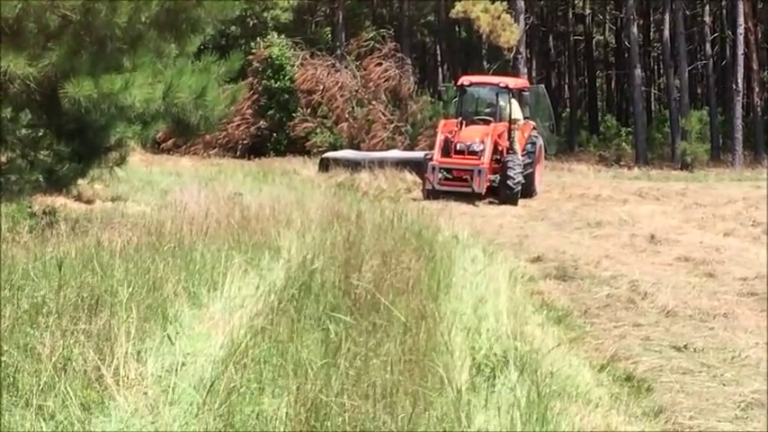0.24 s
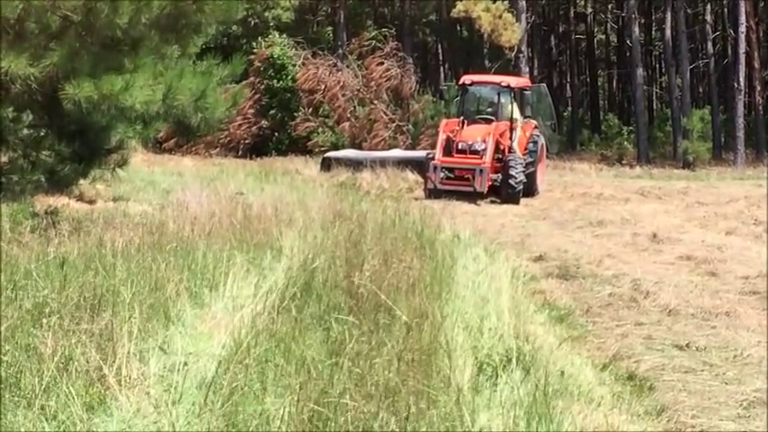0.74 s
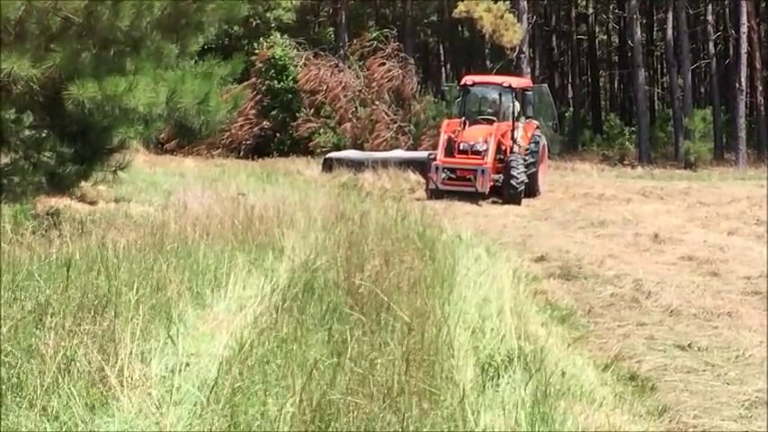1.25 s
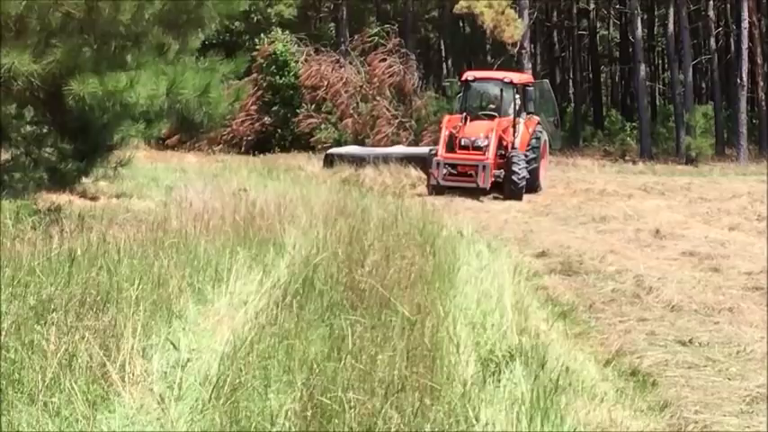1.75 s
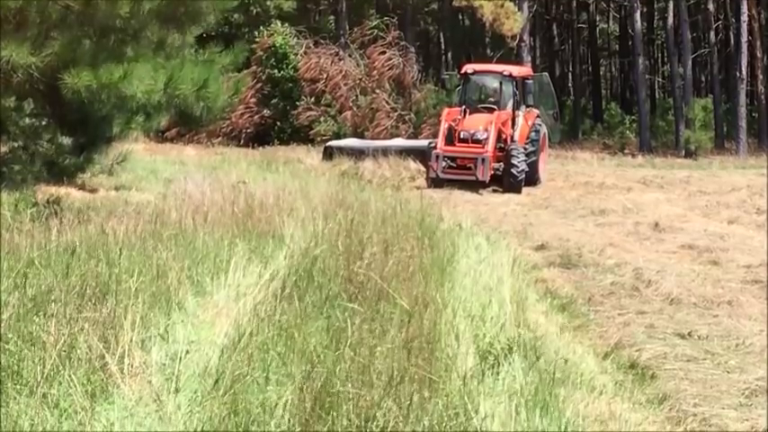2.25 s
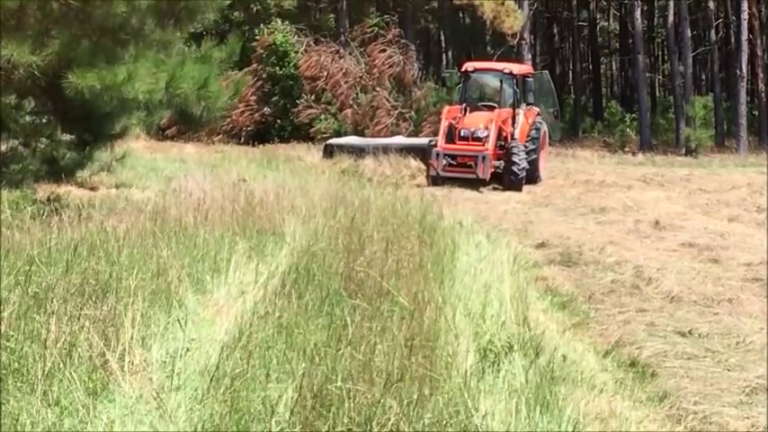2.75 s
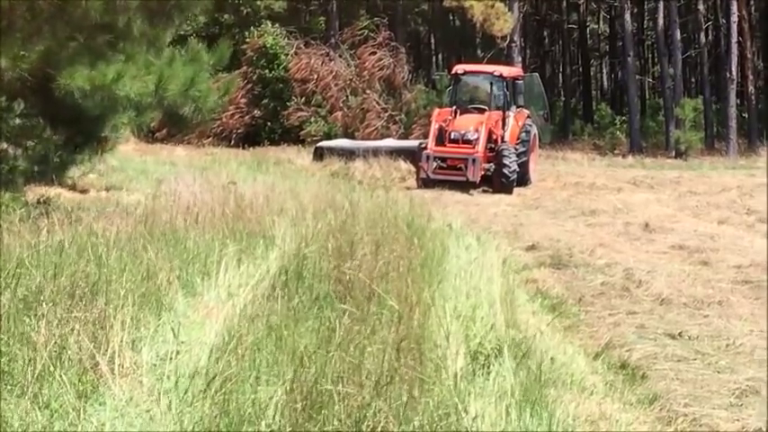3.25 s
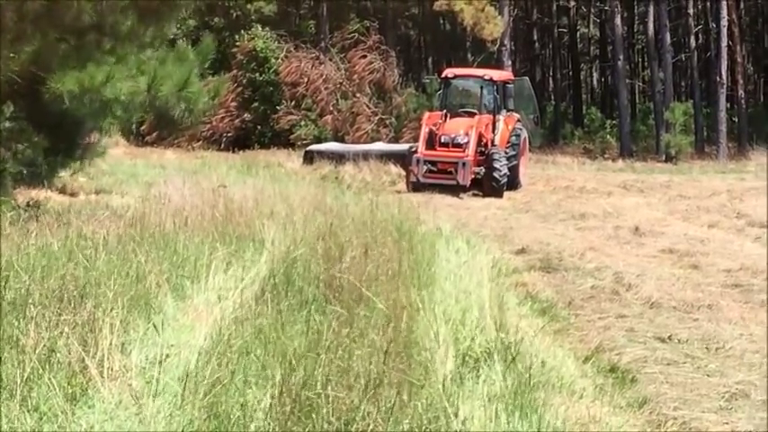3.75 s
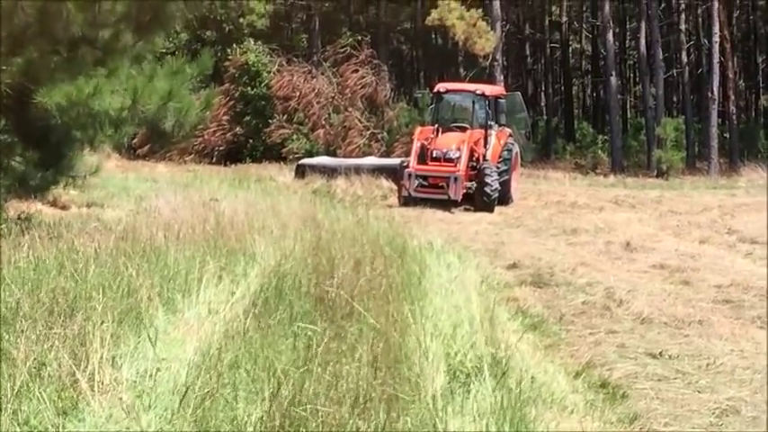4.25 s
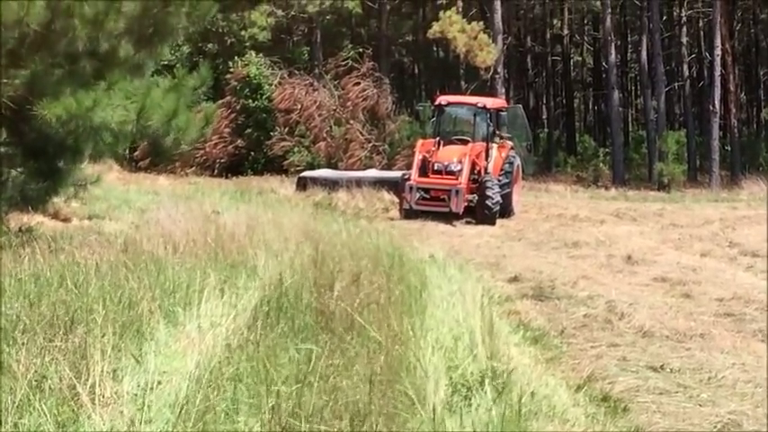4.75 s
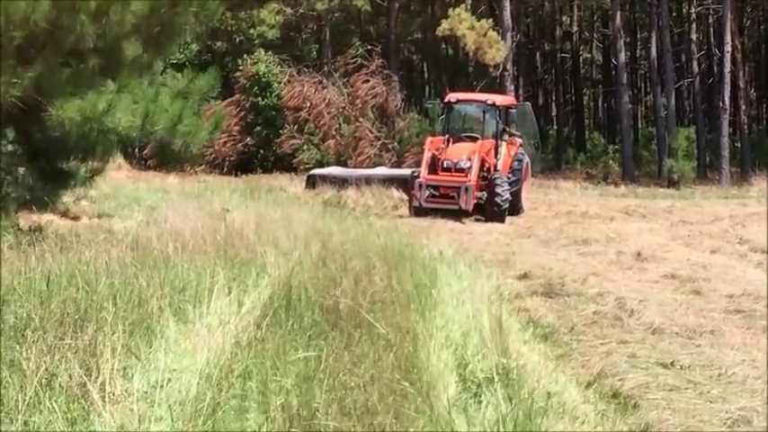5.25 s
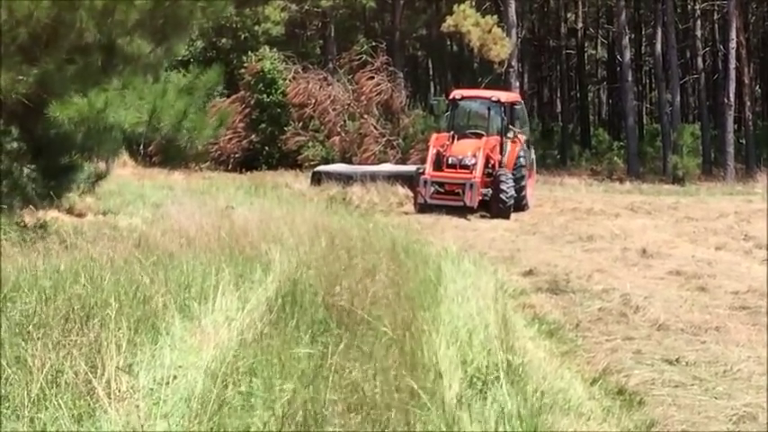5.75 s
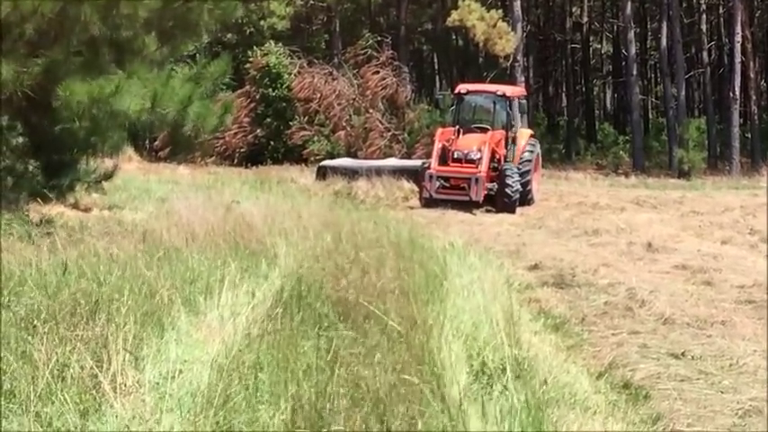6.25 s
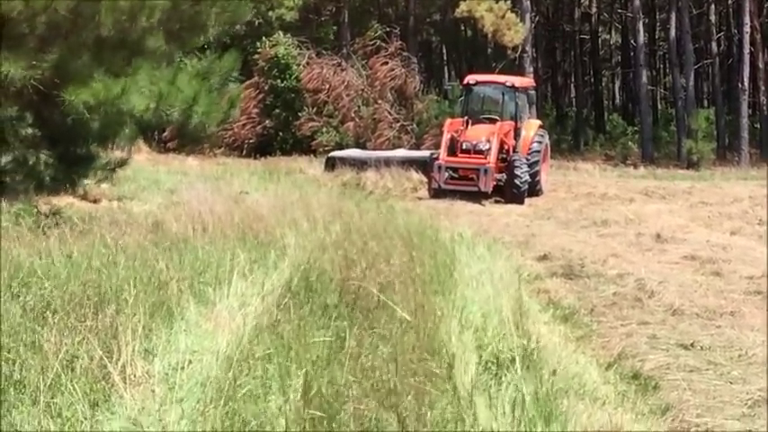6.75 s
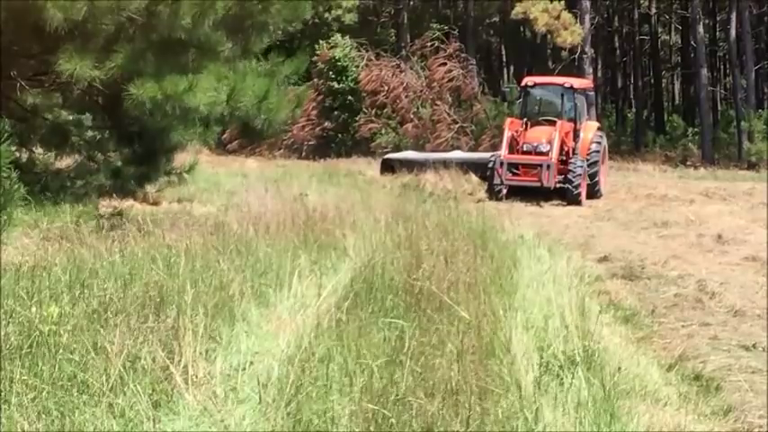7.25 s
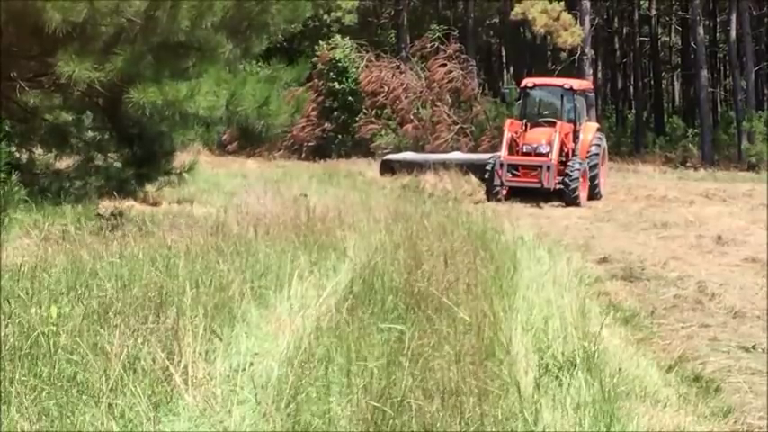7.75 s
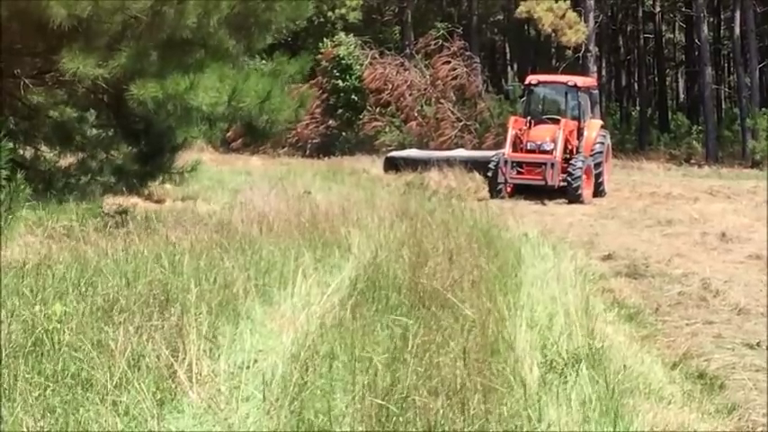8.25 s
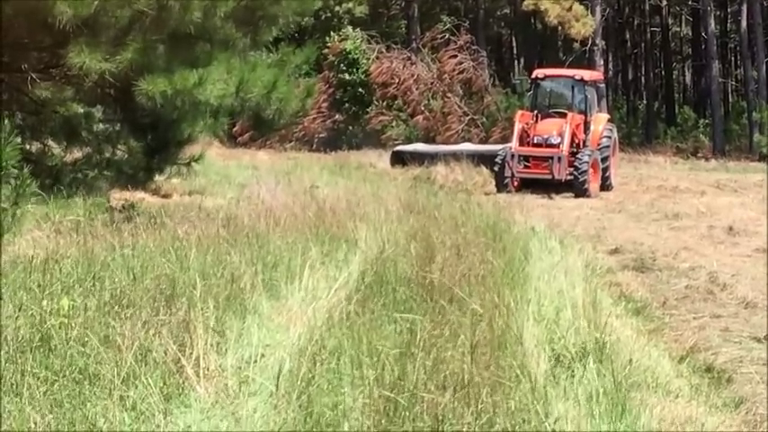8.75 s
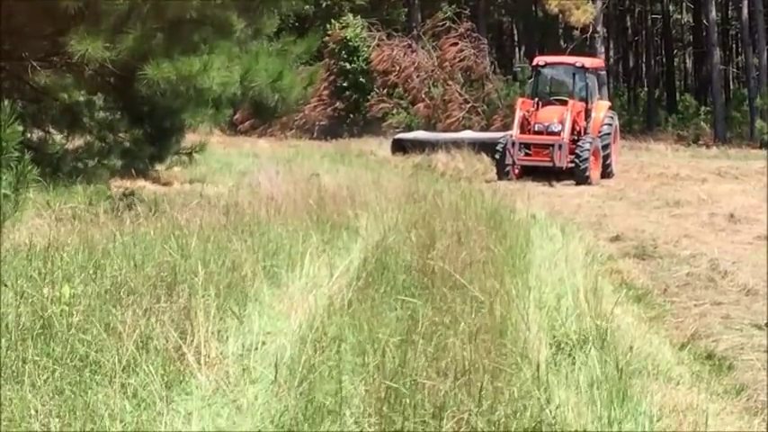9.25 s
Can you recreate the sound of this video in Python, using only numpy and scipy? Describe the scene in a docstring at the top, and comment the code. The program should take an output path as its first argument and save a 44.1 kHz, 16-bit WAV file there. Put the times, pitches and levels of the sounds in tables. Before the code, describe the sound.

A distant mower throbs fast and evenly behind a rattling diesel engine. Low ragged churning surges early on, and a thin squeak stands out in spells. Each turn of the drive knocks the deck and swishes through stalks. The whole sound slowly fades out, is silent for an instant, then slowly fades in, the machine slightly slower, with faint insect buzz and bird chirps. Open-air, distant microphone, little echo.

```python
"""Tractor mowing a field

A diesel tractor mows some way off, its mower drive turning about ten times a second. Each turn brings a
booming thump, two strong and two weak knocks ringing the deck, noise swishes and a ringing scrape.
In spells a wavering-tone squeak stands out. Nine engine firings per turn rattle resonances over hum and roar.
Faint: filtered-noise insects, gliding bird notes, dull bumps. All fades to silence and back."""
import sys
import numpy as np
from scipy import signal
from scipy.fft import rfft, irfft
from scipy.io import wavfile
from scipy.ndimage import uniform_filter1d

SR = 44100
rng = np.random.default_rng(int(sys.argv[2]) if len(sys.argv) > 2 else 0)


def digitize_waveform(pressure):
    """Quantize a signal to 16-bit integers and store it at the path in sys.argv[1].

    Rows of a 2-D input are taken as channels; values are limited to [-1, 1].
    """
    field = np.atleast_2d(pressure).T
    bounded = np.clip(field, -1, 1)
    quanta = np.round(bounded * 32767).astype(np.int16)
    wavfile.write(sys.argv[1], SR, quanta)


N = 418509

# insect resonances, applied twice: pitch_hz, width_hz, level_db (each pass)
INSECT_MODES = [(4300, 860, 1.5), (5390, 215, 6.5), (5980, 770, 0), (9240, 550, -0.5), (9860, 590, -3)]
# louder insect spells: start_s, end_s, rise_db
INSECT_SPELLS = [(3.2, 3.55, 6), (6.9, 9.49, 9)]
INSECT_EDGE_S = 0.45
# bird calls: start_s, level_db
BIRD_CALLS = [(7.908, -58), (8.115, -52.5), (8.327, -51.5)]
# notes of one call, thin high then rising: delay_s, length_s, start_hz, end_hz, level_db
BIRD_NOTES = [(0, .036, 7400, 7550, -7), (.035, 0.047, 5720, 6260, 0)]
# dull machine bumps: start_s, pitch_hz, peak_db
BUMPS = [(0.80, 260, -33), (0.979, 369, -27.5), (1.755, 332, -33.5)]
BUMP_RISE_S = 0.0042
# steady treble hiss spectrum: freq_hz, density_db
HISS_SPECTRUM = [(5000, -30), (10500, -9), (11300, -3), (14000, -3), (15000, 1), (15800, 2)]

# drive speed: time_s, speed_turns_per_s
DRIVE_SPEED = [(0.0, 10.59), (0.6, 10.608), (1.2, 10.562), (1.8, 10.453), (3.0, 10.49), (4.0, 10.546),
               (5.0, 10.469), (5.8, 10.433), (6.5, 10.286), (7.3, 10.312), (8.2, 10.355), (9.0, 10.311),
               (9.49, 10.119)]
FIRST_TURN = 0.148  # drive phase at the start, turns

# dry joint rubs: place_turns, level_db
RUBS = [(.215, -4), (.625, 0)]
# squeak tones: pitch_hz, wander_hz, level_db
SQUEAK_TONES = [(4630, 28, -5.5), (5536, 23, -3), (6500, 100, -21.5), (7140, 320, -13.5)]
# squeak spells above the faint squeak: start_s, end_s, rise_db
SQUEAK_SPELLS = [(.3, 1.4, 12), (3.15, 3.85, 9), (6.348, 6.8, 8.5), (9.3, 9.49, 6.5)]
SQUEAK_EDGE_S = 0.41

# blade sweeps through stalks: place_turns, level_db
SWEEPS = [(.255, 0), (.61, -6), (.79, -9)]
# swish spectrum: freq_hz, density_db
SWISH_SPECTRUM = [(800, -20), (2800, 4), (4000, 2), (7000, 0), (8300, -3), (9500, -1), (10500, -6),
                  (13000, -4), (15500, -4)]
# steel-on-steel scrapes: place_turns, level_db
SCRAPES = [(.775, 0)]
# scraping steel resonances: pitch_hz, width_hz, level_db
STEEL_MODES = [(1710, 270, 14), (2170, 106, 13.5), (2466, 210, 7.5), (3004, 104, 5.5), (3243, 154, 5),
               (4330, 30, 10), (4590, 133, 2.5), (5200, 59, 4), (5460, 150, 2.5), (6050, 55, 5),
               (5980, 120, -8), (7040, 310, -0.5), (7550, 120, -1)]

# engine block and panel resonances: pitch_hz, width_hz, level_db
BLOCK_MODES = [(734, 40, -6.5), (827, 20, -6), (914, 13, -3.5), (1063, 62, -2), (1123, 45, -1),
               (1171, 43, -1), (1273, 35, -3), (1354, 42, -2.5), (1523, 85, -9), (1610, 25, -3.5),
               (1740, 28, -10.5), (1762, 23, -2.5), (1942, 74, -7.5), (2100, 61, -12.5), (2204, 115, -12),
               (2412, 57, -13.5), (2480, 17, -7)]
# fan and gear roar spectrum: freq_hz, density_db
ROAR_SPECTRUM = [(150, -7), (300, -1.5), (550, -3), (690, -3.5), (880, -11.5), (1300, -6), (1850, -14.5),
                 (2700, -19.5), (3200, -19), (3850, -26), (5500, -31.5), (8400, -35.5), (11300, -37),
                 (15500, -48)]

# deck knocks: place_turns, level_db
KNOCKS = [(-.01, 0), (.32, -2), (.58, -11), (.83, -9)]
# deck resonances: pitch_hz, width_hz, level_db
DECK_MODES = [(225.4, 16.5, -8.5), (384, 9.5, -10), (512.3, 11.6, -5.5), (580.3, 12, -4.5),
              (604.5, 27.8, 0.5), (635, 31, 2), (681, 52, -9), (1055, 22, -18)]
# sheet-metal cover resonances: pitch_hz, width_hz, level_db
COVER_MODES = [(1238, 33, 0.5), (1342, 23, -1.5), (1377, 24, 0.5)]
COVER_DB, COVER_EXTRA_DB, COVER_SETTLE_S = -49, 4, 1.6  # louder at first

# churning spectrum: freq_hz, density_db
RUMBLE_SPECTRUM = [(22, -52.5), (31, -16.5), (40, -5), (70, 1), (120, 2.5), (165, 0), (220, -9), (300, -19),
                   (500, -42)]
# churning surges, as if through thicker tufts: peak_s, rise_db
TUFTS = [(.92, 6.5), (1.12, 6.5), (1.32, 6), (1.56, 6), (1.72, 5.5), (2.1, 8.5), (2.25, 6.5), (2.62, 5.5),
         (2.76, 5.5), (2.88, 3), (4.0, 6.5)]
TUFT_HALF_S = 0.12
LIGHT_LOAD_DB, HEAVY_LOAD_DB, LOAD_WANDER_DB = -35, -30, 1.35
HEAVY_FROM_S, LOAD_RISE_S = 4.1, 0.85

# drive imbalance, a nudge then a shove: place_turns, level_db
SHOVES = [(.05, -17), (.153, 0)]
# hollow boom of each thump: freq_hz, level_db
BOOM_SPECTRUM = [(22, -53), (31, -13), (41, -11), (52, -2), (63, -12), (73, -5.5), (84, -0.5), (94, -0.5),
                 (105, -3.5), (115, -40.5), (126, -21.5), (147, -15), (190, -38), (330, -54.5)]
# slack moments of the thump: time_s, half_length_s, change_db
SLACKS = [(.23, 0.13, -11), (1.927, 0.075, -10), (3.307, 0.12, -6.5)]

FADE_OUT_S, SHUT_AT_S, OPEN_AT_S, FADE_IN_S = 2.56, 6.754, 6.832, 2.6
TOP_HZ = 15800


def undb(db):
    """Decibels to gain."""
    return 10 ** (np.asarray(db) / 20)


def curve(table):
    """(time_s, value) rows joined by straight lines."""
    return np.interp(np.arange(N) / SR, *np.transpose(table))


def level(x, db):
    """Set the rms level."""
    return x * undb(db) / np.sqrt(np.mean(x ** 2))


def ramp(start_s, length_s):
    """Even rise from 0 to 1."""
    return np.clip((np.arange(N) / SR - start_s) / length_s, 0, 1)


def spell(start_s, end_s, edge_s):
    """Envelope: rise to 1 at start, hold to end, fall."""
    return ramp(start_s - edge_s, edge_s) - ramp(end_s, edge_s)


def walk(rate_hz):
    """Random wander through rate_hz new values a second, spread near 0.7."""
    step = int(SR / rate_hz)
    held = np.repeat(rng.standard_normal(N // step + 1), step)
    return 0.87 * uniform_filter1d(held, step)[:N]


def grit(grain_db):
    """Noise of uneven strength, like tiny contacts."""
    return rng.standard_normal(N) * undb(grain_db * walk(1500))


def butter(x, order, edge_hz, kind="low"):
    """Butterworth filter."""
    return signal.sosfilt(signal.butter(order, edge_hz, kind, fs=SR, output="sos"), x)


def colour(x, spectrum, size=32768):
    """Minimum-phase filter with a (freq_hz, level_db) spectrum."""
    hz, db = np.transpose(spectrum)
    log_hz = np.log(np.fft.rfftfreq(size, 1 / SR) + 1e-9)
    log_gain = np.log(undb(np.interp(log_hz, np.log(hz), db)))
    # folding the cepstrum makes the response causal
    cepstrum = irfft(log_gain)
    cepstrum[1:size // 2] *= 2
    cepstrum[size // 2 + 1:] = 0
    response = irfft(np.exp(rfft(cepstrum)))[:size // 2]
    return signal.fftconvolve(x, response)[:N]


def ring(x, modes):
    """Bank of resonances, alternating in sign."""
    out = np.zeros(N)
    for k, (hz, width_hz, db) in enumerate(modes):
        b, a = signal.iirpeak(hz, hz / width_hz, SR)
        out += (-1) ** k * undb(db) * signal.lfilter(b, a, x)
    return out


def blows(turns, place, scatter_db, jitter_s, size=1024):
    """One impulse per turn, scattered in force and timing."""
    chance = rng.standard_normal((size, 2))
    at = np.interp(np.arange(size) + place, turns, np.arange(N), left=-N, right=2 * N)
    at = at + jitter_s * SR * chance[:, 0]
    inside = (at >= 0) & (at < N)
    return np.bincount(at[inside].astype(int), undb(scatter_db * chance[inside, 1]), N)


def strokes(turns, table, scatter_db, jitter_s):
    """Every (place_turns, level_db) blow, repeated each turn."""
    return sum(undb(db) * blows(turns, place, scatter_db, jitter_s) for place, db in table)


def swell(pulses, rise_s):
    """Turn impulses into bumps that peak after rise_s and die away."""
    pole = np.exp(-1 / (rise_s * SR))
    return signal.lfilter([1], [1, -2 * pole, pole ** 2], pulses)


def pattern(turns, size=4096):
    """Random rattle repeating with every turn."""
    return np.interp(turns % 1 * size, np.arange(size), rng.standard_normal(size))


def insects():
    """Resonant noise: a thin, fluttering buzz that swells in spells."""
    buzz = ring(ring(grit(1.9), INSECT_MODES), INSECT_MODES)
    flutter = undb(1.7 * walk(40))
    chorus_db = sum(db * spell(start, end, INSECT_EDGE_S) for start, end, db in INSECT_SPELLS)
    return level(buzz * flutter * undb(chorus_db), -60.5)


def bird():
    """Gliding sines under smooth envelopes: quick two-note calls."""
    out, t = np.zeros(N), np.arange(N) / SR
    for start, call_db in BIRD_CALLS:
        for delay, length, from_hz, to_hz, db in BIRD_NOTES:
            on = (t > start + delay) & (t < start + delay + length)
            pitch_hz = np.linspace(from_hz, to_hz, on.sum())
            glide = np.sin(2 * np.pi * np.cumsum(pitch_hz) / SR)
            out[on] += undb(call_db + db) * np.sqrt(2) * np.hanning(on.sum()) * glide
    return out


def bumps():
    """Dull machine bumps: low sines that die at once."""
    out = np.zeros(N)
    for start, hz, db in BUMPS:
        age_s = np.maximum(np.arange(N) / SR - start, 0)
        envelope = age_s / BUMP_RISE_S * np.exp(1 - age_s / BUMP_RISE_S)
        out += undb(db) * envelope * np.sin(2 * np.pi * hz * age_s)
    return out


def hiss():
    """Steady grainy noise, mostly above 10 kHz."""
    return level(colour(grit(3.6), HISS_SPECTRUM), -64)


def squeak(turns):
    """A dry joint chirps on the way out and, louder, on the way back, with a little rasp."""
    rubs = swell(strokes(turns, RUBS, scatter_db=2.5, jitter_s=0.0032), rise_s=0.0039)
    tones = np.zeros(N)
    for hz, wander_hz, db in SQUEAK_TONES:
        pitch_hz = hz + wander_hz * walk(500)
        tones += undb(db) * np.sin(2 * np.pi * np.cumsum(pitch_hz) / SR)
    rasp = level(butter(grit(1.5), 2, [4000, 8000], "band"), -13)
    dryness_db = sum(db * spell(start, end, SQUEAK_EDGE_S) for start, end, db in SQUEAK_SPELLS)
    return level(rubs * (tones + rasp) * undb(dryness_db), -63.5)


def swish(turns):
    """Blades sweep through stalks: noise swells, strongest once a turn."""
    sweep = swell(strokes(turns, SWEEPS, scatter_db=1.2, jitter_s=0.0015), rise_s=0.0075)
    return level(colour(sweep * grit(2.8), SWISH_SPECTRUM), -57.5)


def scrape(turns):
    """Steel rubs on steel half a turn after the main swish, never quite silent between."""
    rub = level(swell(strokes(turns, SCRAPES, scatter_db=1.1, jitter_s=0.002), rise_s=0.007), 0)
    steel = ring((rub + 0.44) * grit(0.95), STEEL_MODES)
    return level(butter(steel, 3, 8000), -52)


def engine(turns, count=9):
    """Nine firings per drive turn hum in the exhaust and rattle the block; fan and gears roar."""
    hum = np.cos(2 * np.pi * (turns * count - 0.62))
    firings = blows(turns * count, place=0.51, scatter_db=4.5, jitter_s=0.00022)
    firings = level(swell(firings, rise_s=0.0013), 0)
    # rattle persists between firings; part repeats with the gears
    contacts = (firings + 0.82) * (grit(2.5) + 0.88 * pattern(turns))
    clatter = ring(contacts, BLOCK_MODES) * undb(0.58 * walk(4.4))
    clatter = butter(clatter, 2, [550, 2900], "band")
    gears = butter(pattern(turns), 2, 1100)
    roar = colour(grit(2.3) + 0.73 * gears, ROAR_SPECTRUM) * undb(0.5 * walk(9.7))
    return level(hum, -30) + level(clatter, -46) + level(roar, -43)


def knocks(turns):
    """Drive play is taken up with a knock and short rattle, ringing deck and cover."""
    hits = strokes(turns, KNOCKS, scatter_db=0.7, jitter_s=0.0001)
    rattle_envelope = level(swell(hits, rise_s=0.0067), 0) + 1.2
    rattle = rattle_envelope * (rng.standard_normal(N) + 1.1 * pattern(turns))
    deck = ring(level(hits, 0) + level(rattle, -9), DECK_MODES)
    deck = butter(deck, 3, 1400)
    cover = ring(level(hits, -5.5) + level(rattle, 0), COVER_MODES)
    cover = butter(cover, 2, [1050, 1550], "band")
    extra_db = COVER_EXTRA_DB * (1 - ramp(0, COVER_SETTLE_S))
    return level(deck, -40.5) + level(cover, COVER_DB) * undb(extra_db)


def load_db():
    """Mowing effort: light then heavy going, with surges and a random wander."""
    going = LIGHT_LOAD_DB + (HEAVY_LOAD_DB - LIGHT_LOAD_DB) * ramp(HEAVY_FROM_S, LOAD_RISE_S)
    surges = sum(db * spell(at, at, TUFT_HALF_S) for at, db in TUFTS)
    return going + surges + LOAD_WANDER_DB * walk(14)


def rumble(turns):
    """Low, ragged churning under the deck: noise that follows the load."""
    pulse = 1 + 0.066 * np.cos(2 * np.pi * (turns - 0.2))
    churn = colour(rng.standard_normal(N) * pulse, RUMBLE_SPECTRUM)
    return level(butter(churn, 2, 600), 0) * undb(load_db())


def thump(turns):
    """The unbalanced drive nudges, then shoves the mower each turn; it booms, at times slackly."""
    force_db = sum(db * spell(at, at, half_s) for at, half_s, db in SLACKS)
    shoves = strokes(turns, SHOVES, scatter_db=1.0, jitter_s=0.00013) * undb(force_db)
    boom = butter(colour(shoves, BOOM_SPECTRUM), 4, 300)
    return level(boom, -23.5)


def scene():
    """Sum the background and the machine, whose cycles are geared to the drive."""
    turns = FIRST_TURN + np.cumsum(curve(DRIVE_SPEED)) / SR
    background = insects() + bird() + bumps() + hiss()
    cutting = squeak(turns) + swish(turns) + scrape(turns)
    machine = cutting + engine(turns) + knocks(turns) + rumble(turns) + thump(turns)
    return (background + machine)[None]


def record(dry):
    """Fader closes evenly, rests shut, opens evenly; the top is cut."""
    fader = 1 - ramp(SHUT_AT_S - FADE_OUT_S, FADE_OUT_S) + ramp(OPEN_AT_S, FADE_IN_S)
    top_cut = signal.ellip(10, 0.2, 80, TOP_HZ, fs=SR, output="sos")
    return signal.sosfilt(top_cut, dry * fader)


dry = scene()
out = record(dry)
digitize_waveform(out)
```